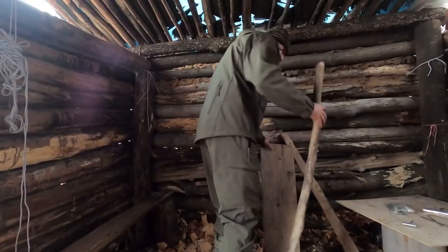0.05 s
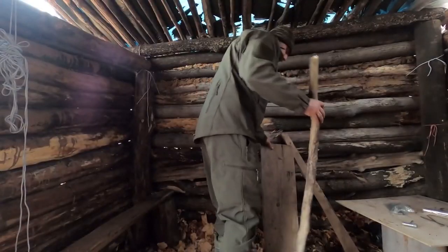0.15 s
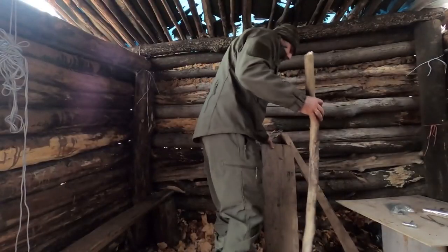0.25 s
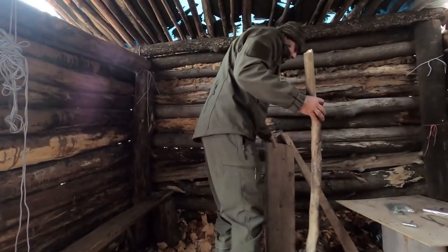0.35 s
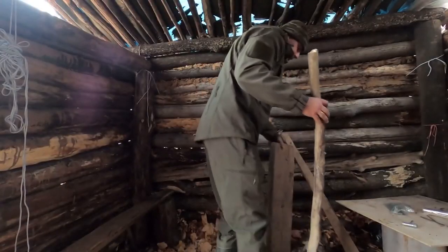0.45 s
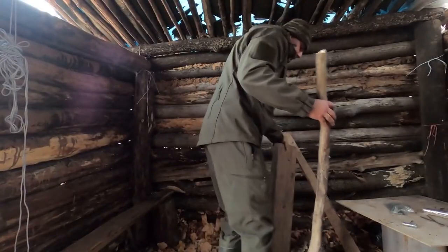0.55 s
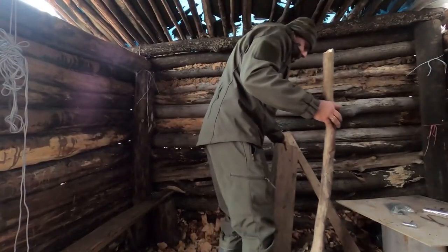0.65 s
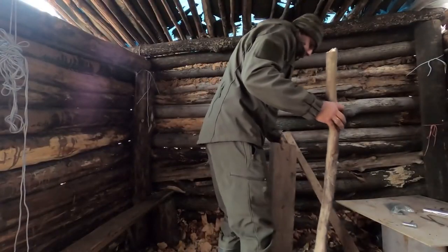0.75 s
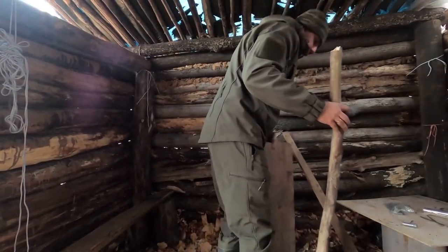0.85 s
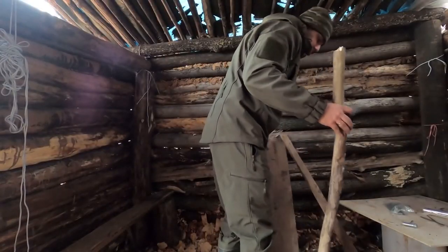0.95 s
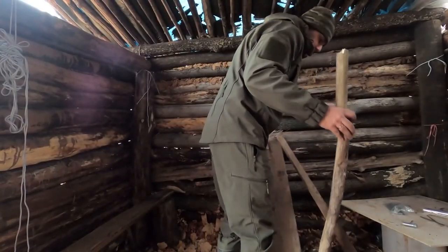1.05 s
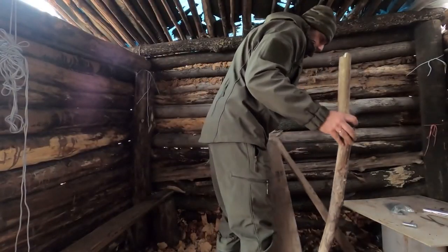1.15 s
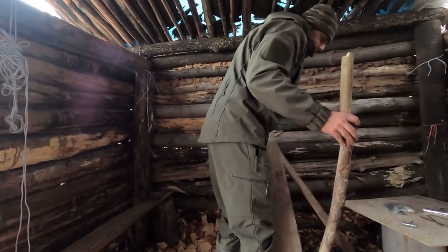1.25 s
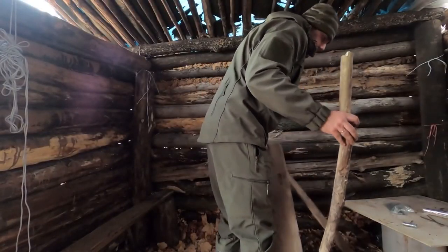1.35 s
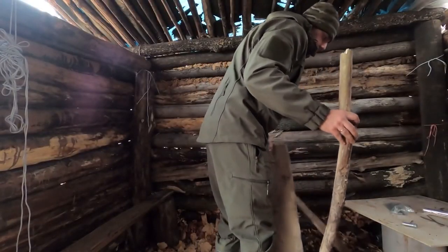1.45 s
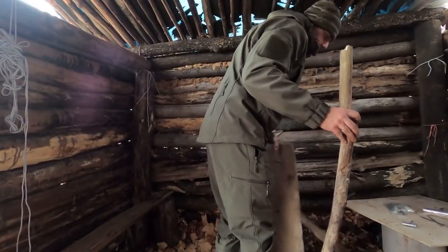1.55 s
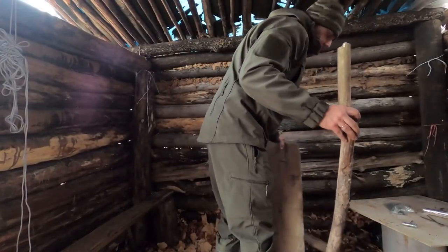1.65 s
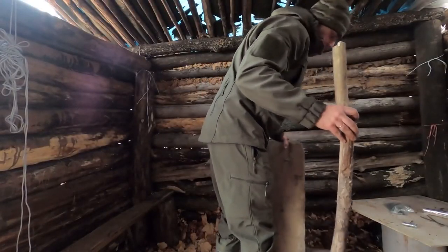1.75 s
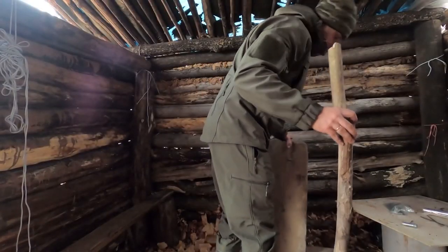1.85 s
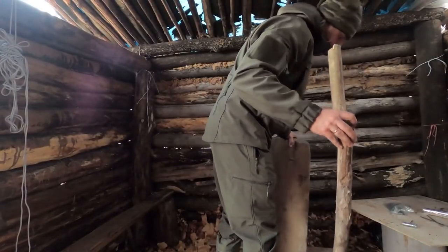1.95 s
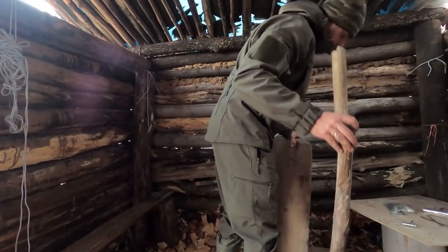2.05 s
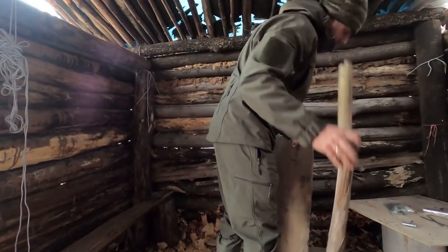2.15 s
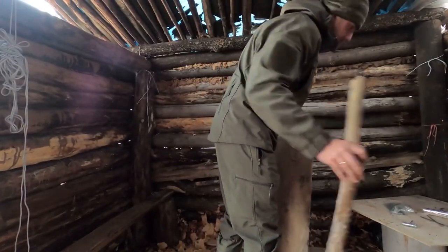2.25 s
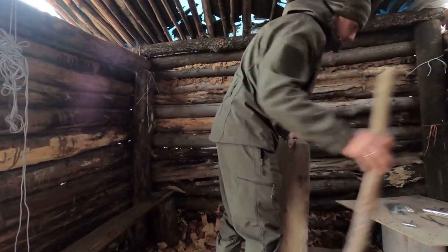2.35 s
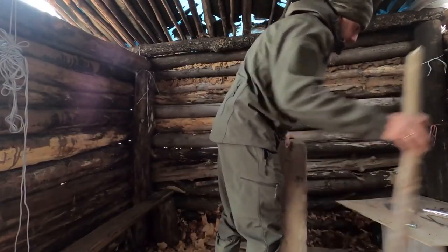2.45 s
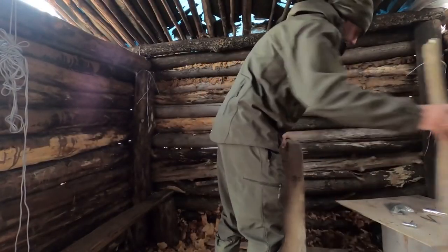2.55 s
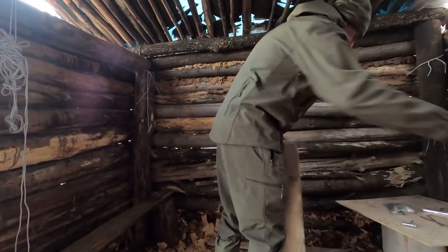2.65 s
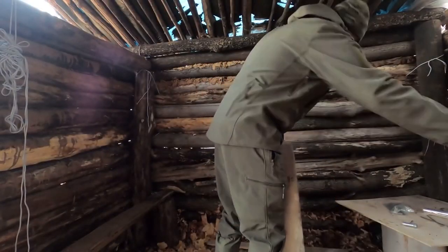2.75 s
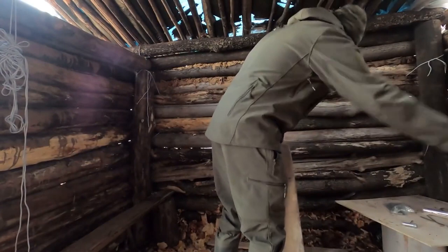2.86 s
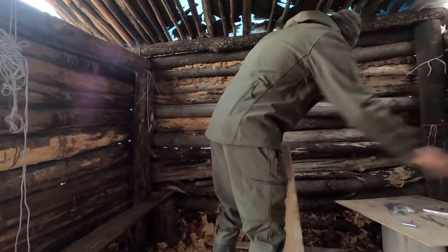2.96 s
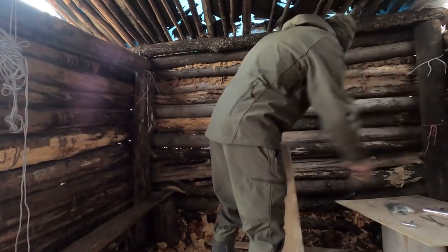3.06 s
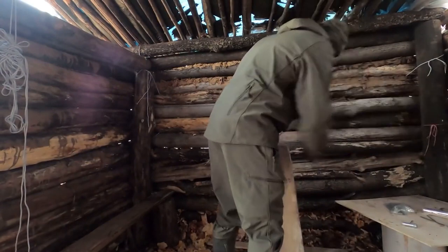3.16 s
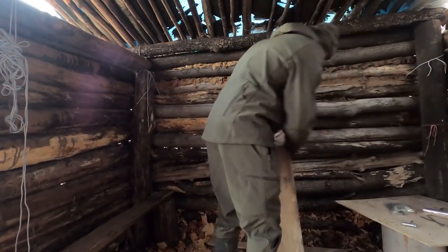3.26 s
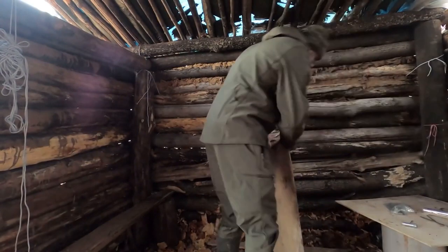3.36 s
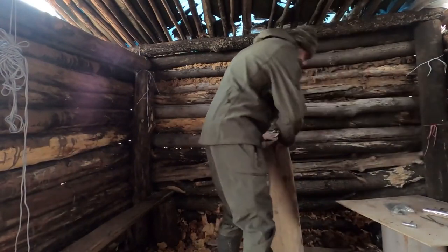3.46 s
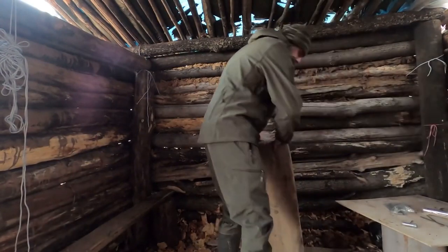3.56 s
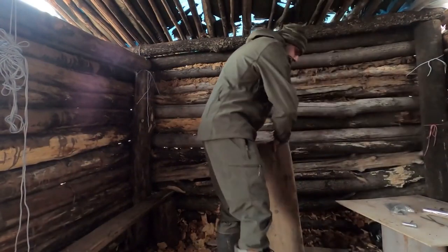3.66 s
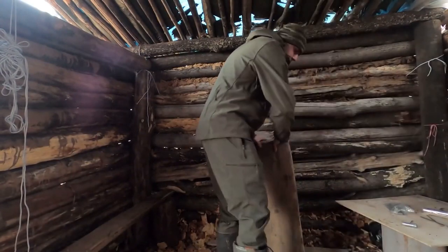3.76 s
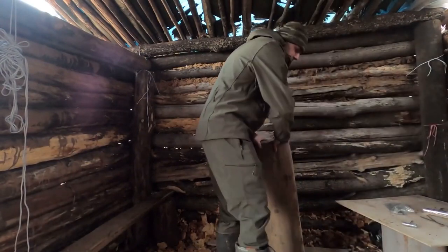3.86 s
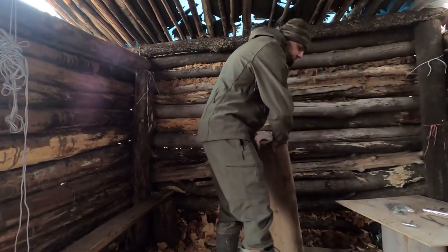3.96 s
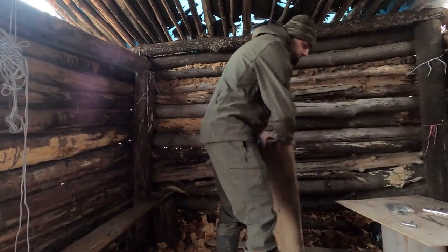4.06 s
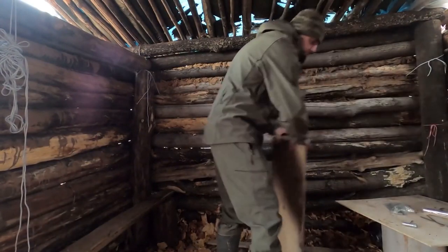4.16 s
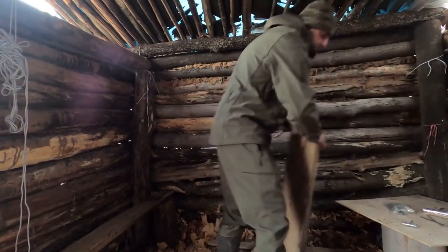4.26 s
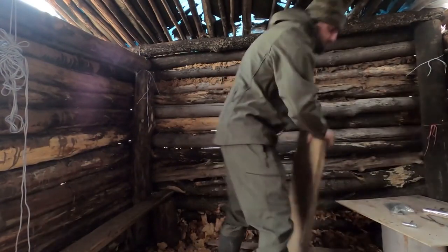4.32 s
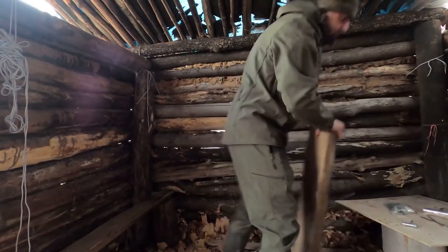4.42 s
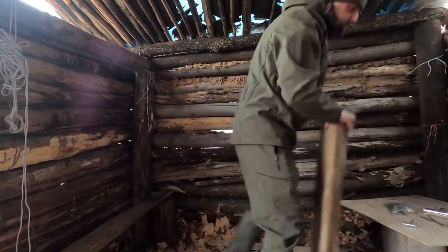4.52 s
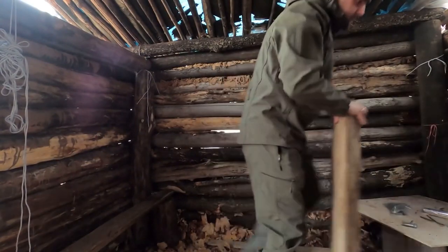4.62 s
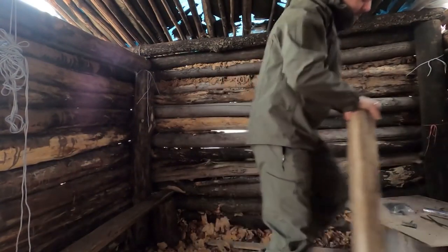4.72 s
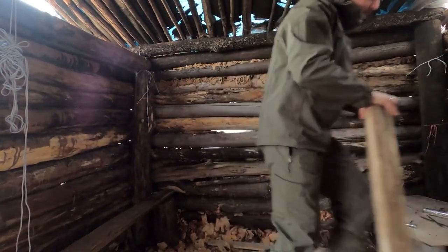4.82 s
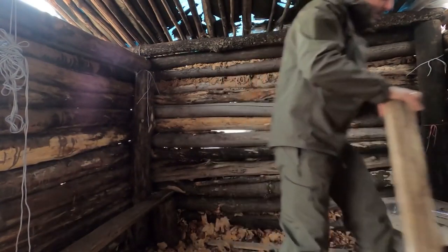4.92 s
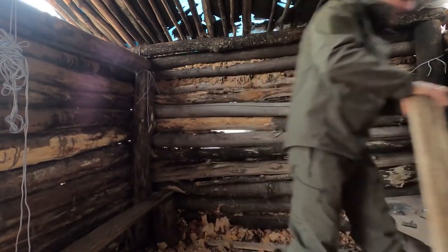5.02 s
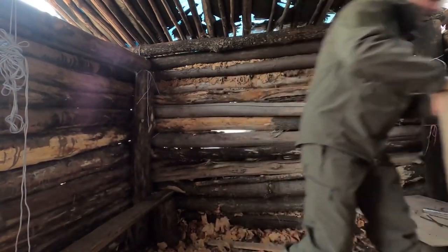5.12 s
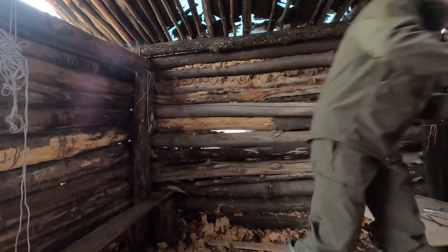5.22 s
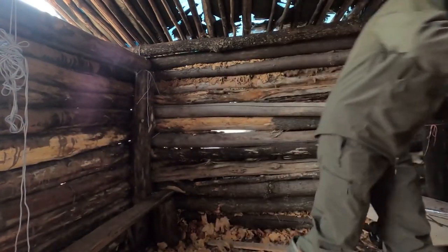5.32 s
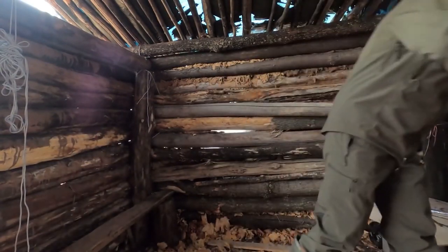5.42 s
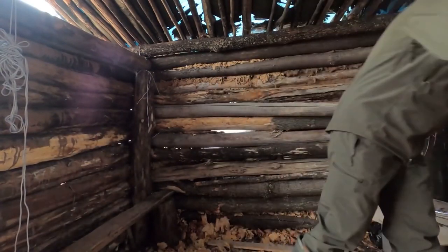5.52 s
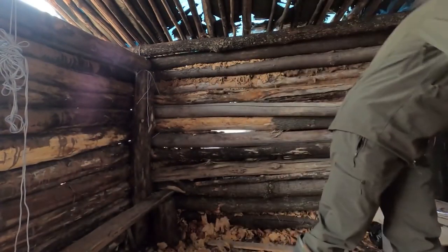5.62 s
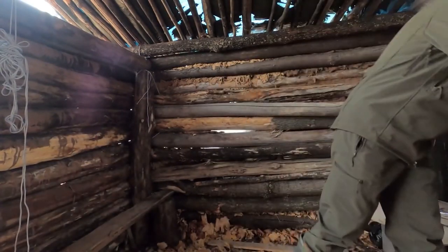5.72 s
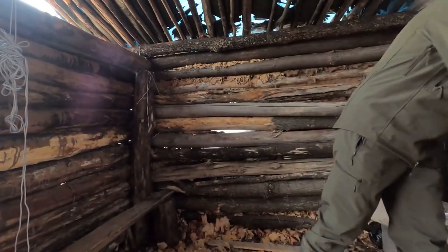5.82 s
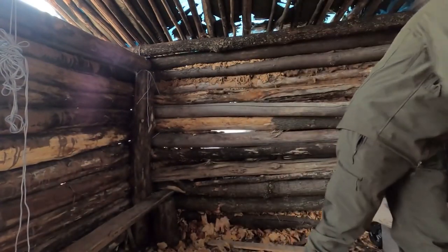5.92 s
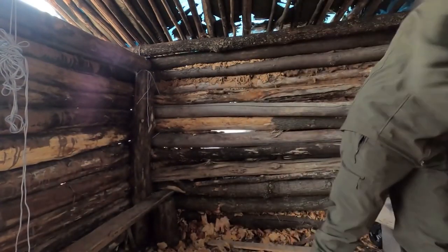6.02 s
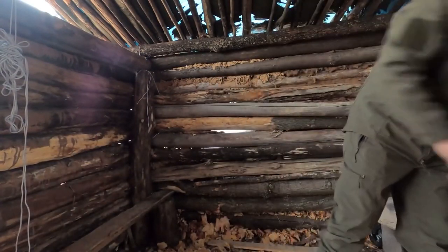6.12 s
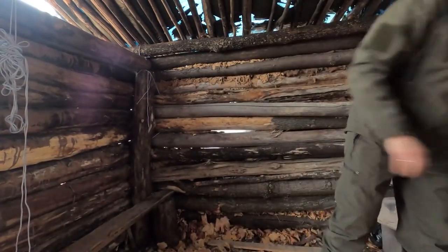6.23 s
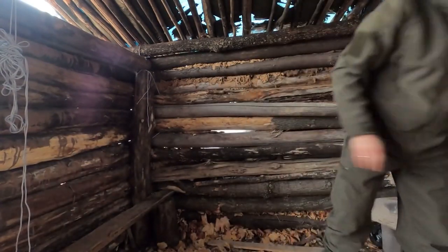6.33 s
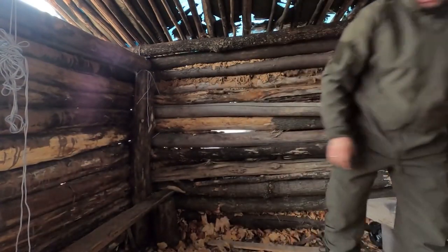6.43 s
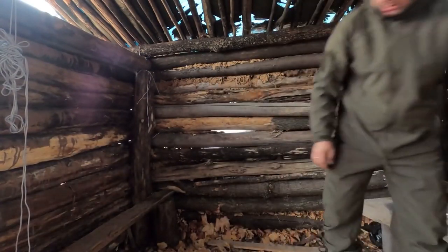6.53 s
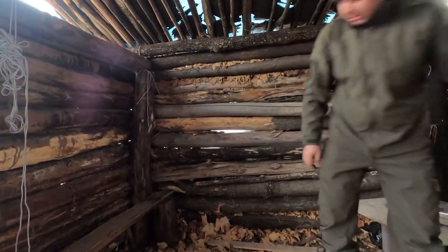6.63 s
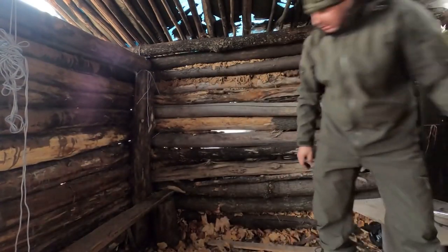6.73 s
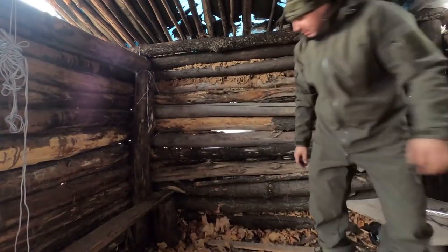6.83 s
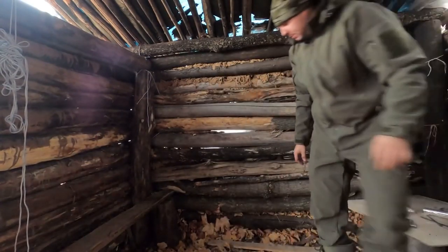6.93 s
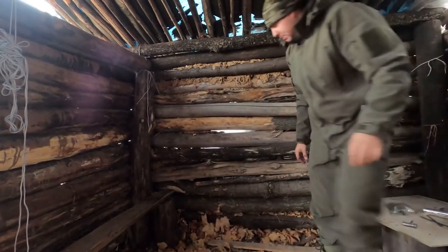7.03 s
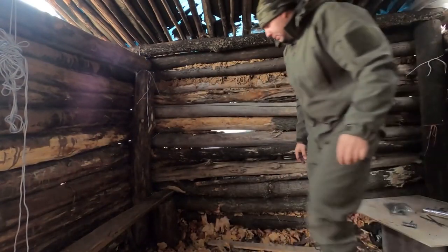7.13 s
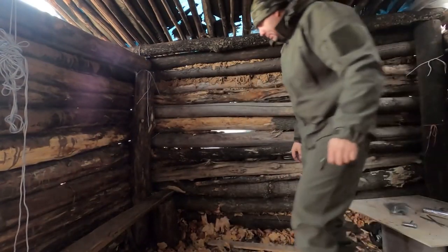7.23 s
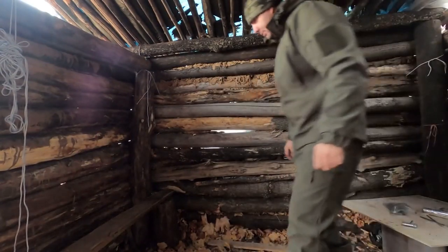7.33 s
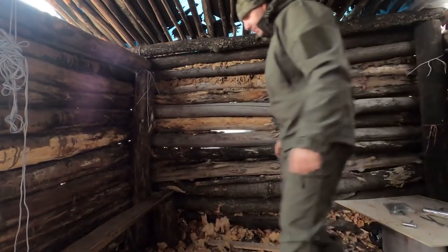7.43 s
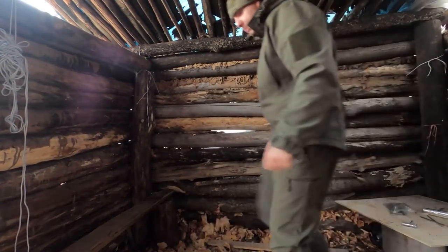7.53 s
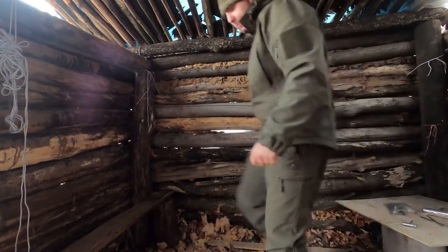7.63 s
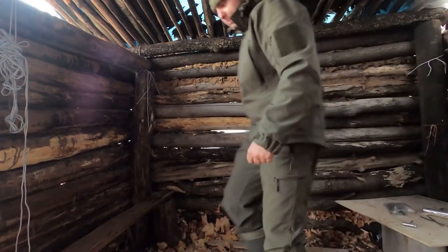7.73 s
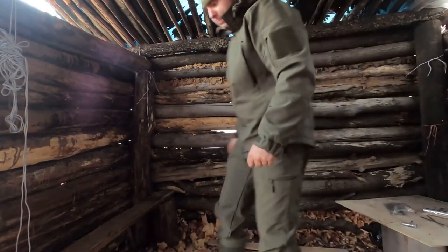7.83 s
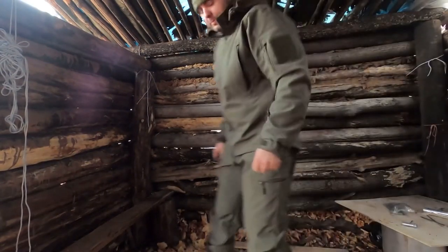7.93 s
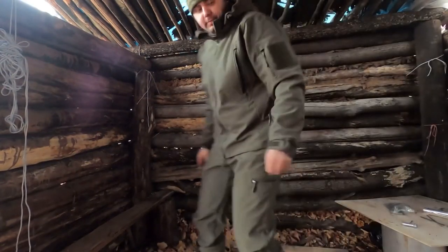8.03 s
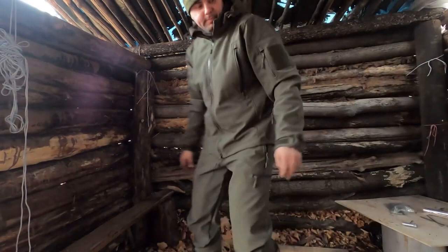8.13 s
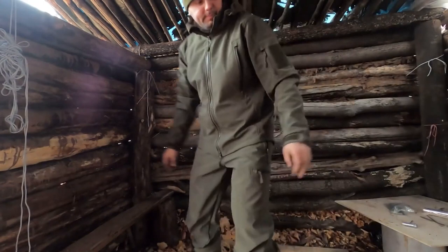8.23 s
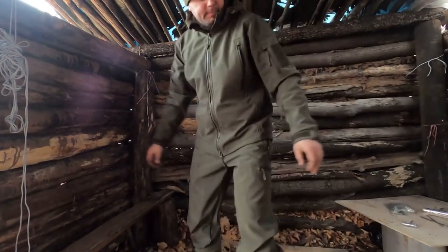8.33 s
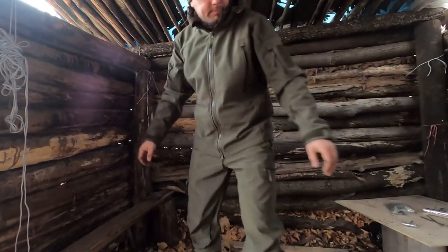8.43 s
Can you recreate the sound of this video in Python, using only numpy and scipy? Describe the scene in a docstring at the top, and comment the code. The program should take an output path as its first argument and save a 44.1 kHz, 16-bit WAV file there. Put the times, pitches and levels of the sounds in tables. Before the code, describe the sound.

Crisp leaf rustling, wooden scraping and sharp plank knocks, a brief metallic ring, then deep booming thumps through logs and ground over faint hiss.

```python
"""Boots shuffle in dry leaves inside a log cabin; a thin pole is dragged, then knocked as a plank lands.
A small metal thing rings once, twigs snap, the plank is set down and leaned on the wall, the pole rubs again.
Heavy loads then boom through logs and ground, and the shuffling goes on to the end over a still hiss.
Wood, logs and metal are dying or held sines; leaves, scuffs, ground and air are shaped noise."""
import sys
import numpy as np
from scipy import signal
from scipy.fft import rfft, irfft
from scipy.io import wavfile
from scipy.ndimage import uniform_filter1d

SR = 44100
rng = np.random.default_rng(int(sys.argv[2]) if len(sys.argv) > 2 else 0)


def wav_record(signal):
    """Record a signal, one row per channel, as 16-bit PCM in the file named by sys.argv[1]."""
    frames = np.transpose(np.atleast_2d(signal))
    bounded = np.clip(frames, -1, 1)
    # unit amplitude maps onto the largest positive 16-bit level
    quanta = np.round(bounded * 32767).astype(np.int16)
    wavfile.write(sys.argv[1], SR, quanta)


N = 373968

# Still air, tone colour: (frequency [Hz], relative level per Hz [dB])
AIR_COLOUR = [(12, -26), (20, -2), (56, -3), (116, -21.5), (185, -8), (333, -18.5), (834, -16),
              (1300, -9.5), (2030, -10.5), (6190, -24.5), (8640, -32), (12400, -49), (15500, -62)]
AIR_DB = -54.5  # overall RMS
# Dry leaves, tone colour: (frequency [Hz], relative level per Hz [dB])
LEAF_COLOUR = [(410, -39), (700, 0), (968, -2), (1120, 0), (1220, -2), (4950, -7), (8990, -20),
               (14300, -40), (15500, -52)]
# Booming ground, tone colour: (frequency [Hz], relative level per Hz [dB])
GROUND_COLOUR = [(8.8, -25), (15, 8), (32, -8.5), (44, -3), (63, -7), (108, -22), (200, -24.5), (260, -68),
                 (440, -120)]
# Likeness of the two ears: (frequency [Hz], likeness [1 = identical; below 0 counts as 0])
EAR_LIKENESS = [(60, 0.95), (180, 0.84), (550, 0.73), (1650, 0.69), (4970, 0.9), (15000, -1.1)]
# Boots and sleeves in the leaves, one row a rustle: (peak time [s], swell [s], fade [s],
# rustle level [dB], brightness [about dB per octave], low scuff level [dB])
RUSTLES = [(0.2, 0.057, 0.49, -53.5, 1, -78), (0.354, 0.46, 0.12, -54, 2.5, -70),
           (0.41, .03, 0.23, -63, 2, -54), (0.55, 0.17, 0.37, -38.5, 1.5, -47),
           (0.62, 0.1, 0.15, -35.5, -0.5, -40.5), (0.699, 0.25, .25, -38, 0, -45.5),
           (0.944, .2, 0.068, -46, 0, -56), (1.08, 0.21, 0.11, -47.5, 2, -55.5), (1.3, 1, .8, -50, .5, -61),
           (1.56, .27, 0.13, -43, -0.5, -50.5), (1.654, 0.15, 0.061, -38, 0, -47),
           (1.702, 0.15, .03, -46, -2, -48.5), (1.86, 0.18, 0.27, -48.5, 0.5, -77),
           (1.96, 0.029, 0.14, -31, -0.5, -47), (2.124, 0.24, 0.11, -38, 0.5, -40.5),
           (2.234, 0.089, 0.077, -38.5, 1.5, -69), (2.428, 0.023, 0.09, -40.5, 1, -63),
           (2.504, .2, 0.074, -51, 6.5, -68), (2.8, 0.95, 0.36, -53.5, 1, -64.5),
           (2.948, 0.19, .18, -47, 1, -57), (3.27, 0.26, .3, -71.5, 1.5, -71),
           (3.424, 0.4, 0.21, -46, 0.5, -56.5), (3.532, 0.14, 0.21, -50, 2.5, -68),
           (3.656, 0.037, 0.028, -43.5, 1.5, -58), (3.79, 0.16, 0.22, -47, -3, -53.5),
           (3.89, 0.54, 0.28, -50, 2.5, -69), (4.13, 0.23, 0.18, -48.5, 1, -59),
           (4.21, 0.074, 0.066, -43.5, 1, -49), (4.32, 0.088, 0.33, -42, 1.5, -49.5),
           (4.42, 0.27, 0.053, -45, 0.5, -64), (4.63, .1, 0.11, -52.5, 2.5, -72),
           (4.75, 0.18, 0.1, -52, 3.5, -66), (4.86, 0.16, 0.27, -51, 1.5, -62),
           (5.08, 0.018, 0.037, -48, -2.5, -53), (5.2, 0.015, 0.18, -47.5, 0, -48),
           (5.25, 0.084, 0.16, -43.5, -1.5, -50), (5.32, 0.098, 0.13, -45, 1, -68),
           (5.38, 0.78, .04, -53.5, 1, -72), (5.92, 0.14, 0.16, -46, -3, -53),
           (6.055, 0.062, 0.055, -42, 0, -43.5), (6.21, .14, 0.14, -51.5, -0.5, -52.5),
           (6.31, 0.38, 0.51, -49.5, 1.5, -62), (6.64, 0.055, 0.22, -45.5, 0.5, -64),
           (6.718, 0.14, 0.28, -46, 2.5, -65), (7.0, 0.45, 0.3, -50, 0, -62.5),
           (7.61, 0.14, 0.29, -44.5, 0, -54), (7.755, 0.043, 0.034, -56, 12, -51.5),
           (7.82, 0.073, 0.038, -54.5, 5, -67), (8.1, 0.027, 0.37, -46.5, 2, -56.5),
           (8.27, 0.26, 0.7, -53.5, 1.5, -72), (8.37, 0.72, .06, -47.5, 1, -67),
           (8.44, 0.034, .05, -53, 0.5, -66)]
# The ground under shifting weight: (peak time [s], swell [s], fade [s], level [dB])
BOOMS = [(0.09, 0.085, 0.04, -57), (0.61, 0.037, .36, -42.5), (1.05, .2, 0.091, -50),
         (1.35, 0.29, 0.4, -52), (1.649, 0.031, 0.075, -31.5), (1.84, 0.044, .15, -46),
         (1.97, 0.15, 0.078, -39.5), (2.12, 0.076, 0.072, -51), (2.43, 0.18, .12, -45.5),
         (2.55, .14, 0.18, -45), (3.0, 0.29, 0.091, -48), (3.35, 0.043, 0.11, -30.5), (3.68, .06, .2, -47),
         (3.75, 0.042, 0.28, -44), (4.15, 0.41, .6, -54), (4.98, 0.35, 0.078, -52.5),
         (5.12, 0.035, .3, -57), (5.28, 0.11, 0.084, -31), (5.45, 0.41, 0.29, -41.5),
         (5.901, 0.018, .08, -19), (6.07, 0.057, 0.11, -20), (6.31, .05, 0.083, -27),
         (6.55, .15, 0.17, -41), (7.2, .5, 0.048, -56), (7.618, 0.11, 0.13, -41.5),
         (8.12, 0.044, 0.096, -43.5), (8.36, 0.11, 0.22, -58)]
SWELL_DB = 20  # climb over one swell time, drop over one fade time
RUMBLE_DB = -61.5  # faint steady rumble between the booms
HOP = 128  # samples between level frames
# Partials of the small metal thing: (frequency [Hz], relative level [dB])
METAL_PARTIALS = [(4850, -40), (5378, -54), (6772, -54), (7181, -52), (9254, -61)]
# How the metal is kept ringing: (time [s], level [dB])
METAL_RING = [(1.99, -45), (2.1, -35.5), (2.136, -43), (2.208, -46.5), (2.26, -60)]
# Low modes of the logs: (frequency [Hz], relative level [dB], t60 before each load scales it [s])
LOG_MODES = [(27.2, 2, 1), (51, -3, 0.34), (71.2, 3, 0.35), (97, 1, 0.3), (126, 7, 0.18), (172.5, 7, 0.2),
             (237, -16, 0.24), (300, -7, 0.35), (411, -8, 0.42), (920, -3, 0.25), (1137, 9, .13)]
# Loads on the log wall and floor: (time [s], level before the soft onset [dB], centre of the blow [Hz],
# spread [octaves], ring [factor on the log t60])
THUDS = [(0.61, -34, 34, 0.28, 0.54), (1.638, -44, 59.6, 1.1, 0.54), (5.197, -30, 37.5, 1.34, 0.79),
         (5.268, -40, 48.4, 1.3, 0.9), (5.884, -5.5, 175, 0.92, 0.89), (6.05, -9.5, 115, 1.62, 0.82),
         (6.099, -27, 27.5, 0.91, 0.69), (6.229, -56, 29.6, 1.3, 0.9), (6.297, -12, 52, 1.55, 0.62),
         (7.531, -33, 172, 0.49, 0.75), (7.619, -54, 45.8, 1.3, 0.69), (8.095, -57, 48.4, 1.1, 0.8),
         (1.985, -22.5, 88, 0.21, 0.58), (2.074, -32.5, 85, 0.28, 1.3), (7.585, -38, 173, 0.26, 0.48),
         (1.995, -32, 300, .15, 1.4), (1.245, -44, 170, .3, 0.64), (1.31, -37, 162, 0.34, .7),
         (4.19, -52, 175, 0.36, .8), (7.135, -47.5, 175, .3, 0.55), (7.74, -42, 165, .4, .5),
         (8.172, -42, 140, 0.54, 0.45), (3.315, -15.5, 243, 0.8, 0.51), (5.195, -27.5, 175, 0.42, 0.63),
         (3.737, -19, 181, 0.95, 0.7), (5.885, -27, 915, 0.13, 0.56), (6.051, -31, 1147, 0.17, 0.66)]
# Single twigs and leaves snapping: (time [s], level [dB], pitch [Hz], t60 of the puff [s], ringing share [0-1])
SNAPS = [(1.353, -33, 1410, 0.071, 0.1), (1.926, -32, 1460, 0.05, 0.1), (2.371, -45, 2430, 0.05, 0.15),
         (2.4247, -39, 1300, 0.05, 0.6), (2.48, -36.5, 1550, 0.06, 0.1), (2.5896, -45, 1450, 0.061, 0.2),
         (2.675, -38.5, 1430, 0.043, 0), (2.7478, -38, 1355, 0.13, 0.25), (2.826, -30.5, 1380, 0.05, 0.1),
         (2.893, -40, 1920, 0.096, 0.34), (2.939, -35, 1390, 0.11, 0.2), (3.183, -41, 2530, 0.06, 0.24),
         (3.4267, -28.5, 4400, 0.059, 0.25), (3.5364, -31.5, 4510, 0.056, 0.43),
         (4.5334, -42, 2050, 0.05, 0.2), (4.6183, -38, 3200, 0.045, 0.3), (4.7316, -43, 3600, 0.041, 0.4),
         (5.3408, -29.5, 2330, 0.025, 0.18), (6.2614, -35, 2510, 0.041, 0.2),
         (6.6394, -31.5, 2220, 0.037, 0.18), (6.7645, -33.5, 1440, 0.031, 0.17),
         (6.8634, -41, 1800, 0.043, 0.4), (6.914, -40, 1290, 0.045, 0.26),
         (7.5916, -35.5, 1680, 0.068, 0.04), (7.7494, -42, 1130, 0.043, 0.2),
         (8.089, -39.5, 2620, 0.037, 0), (8.2672, -29.5, 4810, 0.25, 0.24),
         (3.016, -36.5, 4200, 0.065, 0.35), (4.37, -33, 4760, 0.072, 0.9), (5.074, -29.5, 2700, 0.063, 0.2)]
# Modes of the plank: (frequency [Hz], relative level [dB], t60 before the knock shortens it [s])
PLANK_MODES = [(673, -32, 0.12), (761, 3.5, 0.26), (1251, 9, 0.28), (1380, -26, 0.39), (1540, 5, 0.06),
               (1780, -0.5, 0.048), (2446, -19, 0.25), (2800, -1, 0.53), (3190, -9, 0.29)]
# Knocks of the plank: (time [s], body level [dB], body centre [Hz], ringing share [0-1], bass level [dB],
# treble level [dB], chatter t60 [s], first tick [factor against the chatter])
KNOCKS = [(1.952, -32, 1500, 0.3, -32, -30.5, 0.022, 3), (1.981, -7.5, 1010, 0.9, -19, -19, 0.047, 1.7),
          (3.311, -10, 1790, 0, -14, -17.5, 0.1, 0.29), (3.65, -38, 1500, 0, -41.5, -47, 0.059, 4.8),
          (3.731, -6.5, 1550, 0.09, -23, -35, 0.088, 3.4), (3.821, -23.5, 1500, 0.31, -36, -46, 0.082, 4.4),
          (4.198, -38, 1500, 0, -62, -34.5, 0.069, 4.5), (5.883, -26.5, 1910, 0.23, -21, -37, 0.017, 5.5),
          (6.048, -35, 1500, 0, -26, -44, 0.024, 4), (6.235, -44, 1200, 1, -35, -54, 0.23, 4.6),
          (8.356, -23.5, 1380, 0.28, -67, -32, .06, 4.9)]
# Bending modes of the pole: (frequency [Hz], level under a blow [dB], t60 [s])
POLE_MODES = [(230.5, -2.5, 0.16), (403, 2.5, 0.061), (695.6, 6.5, 0.15), (1052, 12.5, 0.052),
              (1373, -1, 0.16), (1435, 10.5, 0.044), (1696, -10.5, 0.061), (1844, 7, 0.13),
              (2250, -1.5, 0.12)]
# Half waves along the pole, one number a mode: (order [count])
POLE_ORDERS = [1, 2, 3, 4, 5, 5, 6, 7, 8]
# The pole rubbing on wood, one list a drag: (time [s], pressure [dB], brightness [dB per octave],
# contact place [share of the length], lowest mode under the grip of the hand [dB])
DRAGS = [
    [(1.05, -64, 2.5, 0.29, -4), (1.22, -49, 8.5, 0.32, 6), (1.3, -52.5, 7, 0.36, 8),
     (1.37, -50.5, 9.5, .34, 1), (1.432, -55, 4.5, 0.38, 5), (1.49, -48.5, 10.5, 0.34, 9),
     (1.57, -44, 1, 0.41, -4), (1.62, -71, 1, 0.45, 0), (1.664, -36.5, 10.5, 0.27, 11),
     (1.734, -61.5, -2.5, 0.37, 15), (1.77, -72, 0, 0.36, 0), (1.85, -72, 3, 0.41, 6)],
    [(2.015, -24, 2.5, .15, 2), (2.081, -45, -2, 0.4, -1.5), (2.145, -34.5, 11.5, .39, 4),
     (2.201, -63, -4, 0.37, -10), (2.235, -51, -9, 0.34, -30), (2.283, -65, -11.5, 0.33, -23),
     (2.34, -77, -3, 0.39, -8)],
    [(4.2, -62, 10, 0.42, 0), (4.27, -78, 9, .3, -5), (4.302, -40, 9, 0.27, -22),
     (4.332, -44.5, 2.5, .32, -34), (4.422, -55, -1.5, 0.31, -7), (4.49, -58, 8, 0.44, 2),
     (4.53, -72, -5, 0.54, 2)],
]
# Blows on the pole: (time [s], level [dB], brightness [dB per octave],
# contact place [share of the length], lowest mode under the grip of the hand [dB])
POLE_BLOWS = [(1.459, -47, 3.5, 0.42, -2), (1.545, -55, -2, .4, 13), (1.654, -45.5, 11.5, .29, 10),
              (1.704, -60, 0, 0.36, 25), (1.946, -48, -9.5, .33, 7), (1.98, -24.5, 2.5, 0.27, -8),
              (1.998, -28.5, -1.5, 0.354, 1), (2.124, -37, -1, 0.17, -20), (2.139, -40.5, -4, 0.12, 1),
              (2.22, -53.5, 11.5, 0.28, -8), (4.309, -48.5, -5, .13, -14), (4.371, -41.5, 2, .28, -15),
              (4.422, -48, 10, 0.11, 0), (4.478, -53, -6, 0.35, -15)]
# Dying of the cabin echoes: (frequency [Hz], t60 [s])
CABIN_T60 = [(100, 0.11), (500, 0.071), (2000, 0.081), (8000, 0.11)]
# Balance of the two ports: (frequency [Hz], left minus right [dB])
BALANCE = [(60, 1.5), (240, 1.5), (950, 2.0), (3770, 2.5), (15000, -2.5)]
EDGE_HZ = 15700  # upper band limit


def gain_of(db):
    """Amplitude factor of a level in dB."""
    return 10 ** (np.asarray(db) / 20)


def evened(x):
    """Scales to an RMS of one."""
    return x / np.sqrt(np.mean(x ** 2) + 1e-20)


def peaked(x):
    """Scales to a peak of one."""
    return x / np.max(abs(x))


def read(points, hz):
    """Reads a curve along a logarithmic frequency axis."""
    f, value = np.transpose(points)
    return np.interp(np.log(hz + 1), np.log(f + 1), value)


def add(mix, s, sound):
    """Lays a sound into the mix at s seconds, cut off at the end."""
    part = mix[round(s * SR):][:len(sound)]
    part += sound[:len(part)]


def band(x, lo_hz, hi_hz):
    """Gentle band-pass."""
    return signal.sosfilt(signal.butter(2, [lo_hz, hi_hz], "band", fs=SR, output="sos"), x)


def two_ears(hz, a, b):
    """Blends two independent spectra into ears that are alike to a set degree at each pitch."""
    same = np.clip(read(EAR_LIKENESS, hz), 0, 1)[:, None]
    return np.array([a, same * a + np.sqrt(1 - same ** 2) * b])


def coloured(pair, field_db, size):
    """Shapes two signals in short-time spectra, as a left and a right ear."""
    hz, t, (a, b) = signal.stft(pair, SR, nperseg=size, noverlap=size * 3 // 4)
    z = two_ears(hz, a, b) * gain_of(field_db(hz[:, None], t))
    return signal.istft(z, SR, nperseg=size, noverlap=size * 3 // 4)[1][:, :N]


def patchwork(bands, hop, width):
    """Random patches over pitch and time, with an RMS of one."""
    grain = rng.standard_normal((bands, N // hop + 2))
    return evened(uniform_filter1d(uniform_filter1d(grain, width, 0), width, 1))


def swells(peak_s, swell_s, fade_s):
    """Power of each swell at every frame: up a straight slope in dB to its peak, down another."""
    late = np.arange(N // HOP + 2) * HOP / SR - peak_s[:, None]
    slope = np.where(late < 0, -late / swell_s[:, None], late / fade_s[:, None])
    return gain_of(-2 * SWELL_DB * slope)  # doubled dB turns amplitude into power


def level_from(power):
    """Amplitude at every sample from power at every frame."""
    frames = np.arange(N // HOP + 2) * HOP / SR
    return np.interp(np.arange(N) / SR, frames, np.sqrt(power))


def reach_db(hz, centre_hz, octaves):
    """How much of a blow centred on one pitch reaches another."""
    return -6 * (np.log2(hz / centre_hz) / octaves) ** 2


def rings(modes, centre_hz, octaves, longer=1):
    """Dying sines of the modes that a blow reaches, over half a second."""
    hz, db, t60 = np.transpose(modes)[:, :, None]
    t = np.arange(SR // 2) / SR
    level_db = db + reach_db(hz, centre_hz, octaves) - 60 * t / (t60 * longer)
    return peaked((gain_of(level_db) * np.sin(2 * np.pi * hz * t)).sum(0))


def air():
    """A still hiss: coloured noise whose level is faintly patchy over pitch and time."""
    patches = 1.3 * patchwork(513, 256, 6)  # dB
    noise = rng.standard_normal((2, N))
    hiss = coloured(noise, lambda hz, t: read(AIR_COLOUR, hz) + patches[:, :len(t)], size=1024)
    return gain_of(AIR_DB) * evened(hiss)


def ground_booms():
    """Shifting weight swells a low noise in the ground over a faint rumble."""
    noise = rng.standard_normal((2, N))
    boom = evened(coloured(noise, lambda hz, t: read(GROUND_COLOUR, hz), size=4096))
    *shape, boom_db = np.transpose(BOOMS)
    power = gain_of(2 * boom_db) @ swells(*shape) + gain_of(2 * RUMBLE_DB)
    return boom * level_from(power)


def leaves_and_scuffs():
    """Leaves break in many small snaps over a brushing hiss; soles scuff in the low part of that noise."""
    *shape, rustle_db, bright_db, scuff_db = np.transpose(RUSTLES)
    each = swells(*shape)
    rustle = gain_of(2 * rustle_db) @ each + 1e-12
    bright = (gain_of(2 * rustle_db) * bright_db) @ each / rustle  # the colour is a blend of all rustles, weighted by their power
    frames = np.arange(N // HOP + 2) * HOP / SR

    strength = gain_of(3.7 * np.minimum(rng.exponential(1, N), 5))
    crackle = strength * (rng.random(N) < 400 / SR)  # about 400 snaps per second
    clumps = abs(uniform_filter1d(evened(crackle) ** 2, 130)) ** .5  # each snap lasts about 3 ms
    rough = rng.standard_normal((2, N)) * (1.8 + 0.23 * clumps)
    patches = 2.33 * patchwork(257, HOP, 9)  # dB

    def leaf_db(hz, t):
        tilt = np.interp(t, frames, bright) * np.log2((hz + 150) / 3000)
        return read(LEAF_COLOUR, hz) + patches[:, :len(t)] + tilt

    leaves = evened(coloured(rough, leaf_db, size=512))
    scuff = evened(band(band(rough[0], 160, 785), 132, 785))
    return leaves * level_from(rustle) + scuff * level_from(gain_of(2 * scuff_db) @ each)


def metal():
    """A few thin high partials held under one level curve, each wavering a little."""
    s, db = np.transpose(METAL_RING)
    t = np.arange(s[0], s[-1], 1 / SR)
    waver = evened(uniform_filter1d(rng.standard_normal((len(METAL_PARTIALS), len(t))), 900))
    tones = np.zeros(len(t))
    for (hz, partial_db), w in zip(METAL_PARTIALS, waver):
        tones += gain_of(partial_db + 2.0 * w) * np.sin(2 * np.pi * hz * t)
    out = np.zeros(N)
    add(out, s[0], evened(tones) * gain_of(np.interp(t, s, db)) * signal.windows.tukey(len(t), .2))
    return out


def thuds():
    """Heavy soft loads ring the low modes of logs and floor; the weight settles over some ms."""
    out = np.zeros(N)
    settling = np.minimum(np.arange(SR // 2) / (0.0071 * SR), 1)  # 7.1 ms
    rise = np.sin(np.pi / 2 * settling) ** 2
    for s, db, centre_hz, octaves, longer in THUDS:
        add(out, s, gain_of(db) * rise * rings(LOG_MODES, centre_hz, octaves, longer))
    return out


def snaps():
    """Each snap is a tick and a puff of noise around its own pitch; stiff twigs ring in a narrow band."""
    out, t = np.zeros(N), np.arange(SR // 8) / SR
    for s, db, hz, t60, ring in SNAPS:
        puff = rng.standard_normal(len(t)) * gain_of(-60 * t / t60)
        puff[0] += 3  # tick
        dull = peaked(band(puff, hz / 1.7, hz * 1.4))
        ringing = peaked(band(puff, hz / 1.03, hz * 1.03))
        add(out, s, gain_of(db) * ((1 - ring) * dull + ring * ringing))
    return out


def knocks():
    """A first tick and a short chatter set off a dull crack and the modes of the plank."""
    out, t = np.zeros(N), np.arange(SR // 4) / SR
    for s, db, hz, ring, bass_db, treble_db, t60, tick in KNOCKS:
        decay = gain_of(-60 * (t / t60) ** 1.15)
        chatter = rng.standard_normal(len(t)) * decay * np.minimum(t / 0.0075, 1)
        blunt_tick = tick * np.exp(-((t - .0006) / .00007) ** 2)  # rounded, at 0.6 ms
        drive = chatter + blunt_tick

        crack = peaked(band(band(drive, hz / 2.0, hz * 1.51), hz / 3.9, hz * 5.8))
        plank = rings(PLANK_MODES, hz, octaves=0.44, longer=0.26)
        modes = peaked(signal.oaconvolve(drive, plank)[:len(t)])
        body = gain_of(db) * ((1 - ring) * crack + ring * modes)
        bass = gain_of(bass_db) * peaked(band(chatter, 83, 560))
        treble = gain_of(treble_db) * peaked(band(band(chatter, 1500, 4030), 2000, 12000))
        add(out, s, body + bass + treble)
    return out


def touch(db, bright_db, place, grip_db, hz, order):
    """Gain of one bending mode: a contact near a node hardly moves it; the hand frees or mutes the lowest."""
    level_db = db + bright_db * np.log2(hz / 1000) + grip_db * (order == 1)
    return gain_of(level_db) * (abs(np.sin(np.pi * order * place)) + 0.062)


def pole_drags(tones):
    """Uneven slips rub the five lowest bending modes of the pole."""
    out = np.zeros(N)
    for rows in DRAGS:
        s, *controls = np.transpose(rows)
        t = np.arange(s[0], s[-1], 1 / SR)
        jerks = rng.random(len(t)) < 300 / SR  # about 300 per second
        slips = evened(rng.standard_normal(len(t)) * (0.38 + 8 * jerks))
        contact = [np.interp(t, s, c) for c in controls]
        fade = signal.windows.tukey(len(t), .1)
        for tone, mode, order in zip(tones[:5], POLE_MODES, POLE_ORDERS):
            drive = slips * touch(*contact, mode[0], order) * fade
            # equal energy per mode: the blow levels play no part in rubbing
            add(out, s[0], signal.oaconvolve(drive, tone / np.linalg.norm(tone)))
    return out


def pole_blows(tones):
    """Single blows ring all bending modes of the pole, as the place of contact allows."""
    out = np.zeros(N)
    rise = np.minimum(np.arange(SR // 4) / (0.0023 * SR), 1)  # wood on wood meets softly, over 2.3 ms
    for s, *contact in POLE_BLOWS:
        ringing = np.zeros(SR // 4)
        for tone, mode, order in zip(tones, POLE_MODES, POLE_ORDERS):
            ringing += touch(*contact, mode[0], order) * tone
        add(out, s, rise * ringing)
    return out


def pole():
    """The dragged and knocked pole: every bending mode is one dying sine."""
    tones = [gain_of(mode[1]) * rings([mode], 1, np.inf)[:SR // 4] for mode in POLE_MODES]
    return pole_drags(tones) + pole_blows(tones)


def cabin(x):
    """Sparse echoes from the round logs, each band dying at its own speed; the bass is alike in both ears."""
    taps = np.zeros((2, SR // 2))
    grid = np.arange(130, SR // 2 - 20, 20)  # one echo in every 20 samples
    at = grid + rng.integers(0, 20, (2, len(grid)))
    np.put_along_axis(taps, at, rng.choice([-1., 1.], at.shape), 1)
    hz, t, (a, b) = signal.stft(taps, SR, nperseg=256)
    z = two_ears(hz, a, b) * gain_of(-60 * t / read(CABIN_T60, hz)[:, None])
    tail = signal.istft(z, SR, nperseg=256)[1]
    return signal.fftconvolve(x[None], tail / np.linalg.norm(tail[0]), axes=1)[:, :N]


def scene():
    """Only the wood is sent to the cabin echoes; everything else is laid in dry."""
    wood = snaps() + knocks() + pole()
    background = air() + ground_booms() + leaves_and_scuffs()
    return background + metal() + thuds() + gain_of(-4.0) * cabin(wood) + wood


def record(dry):
    """The left port is a little louder below the treble and hears two samples late; then the band limit."""
    lean = gain_of(read(BALANCE, np.fft.rfftfreq(N, 1 / SR)) / 2)  # half the difference on each side
    late_left = np.array([np.roll(dry[0], 2), dry[1]])
    ports = irfft(rfft(late_left) * [lean, 1 / lean], N)
    low_pass = signal.firwin(511, EDGE_HZ, window=("kaiser", 9), fs=SR)
    return signal.oaconvolve(ports, low_pass[None], "same")


dry = scene()
out = record(dry)
wav_record(out)
```